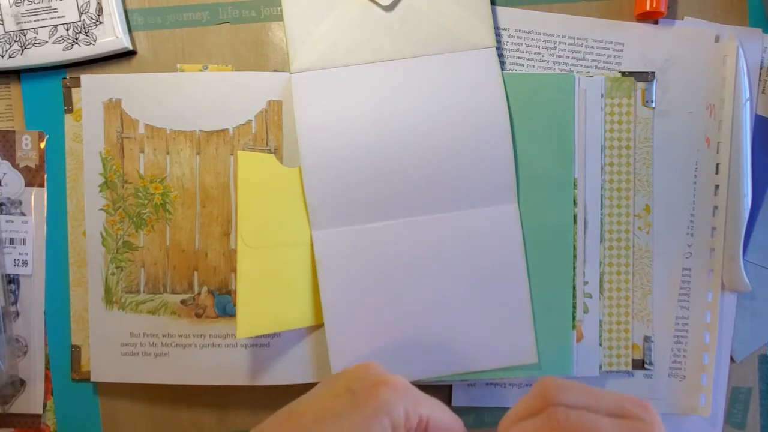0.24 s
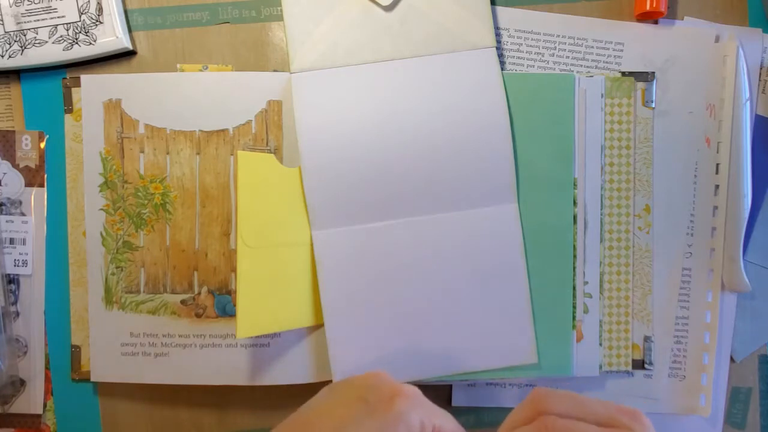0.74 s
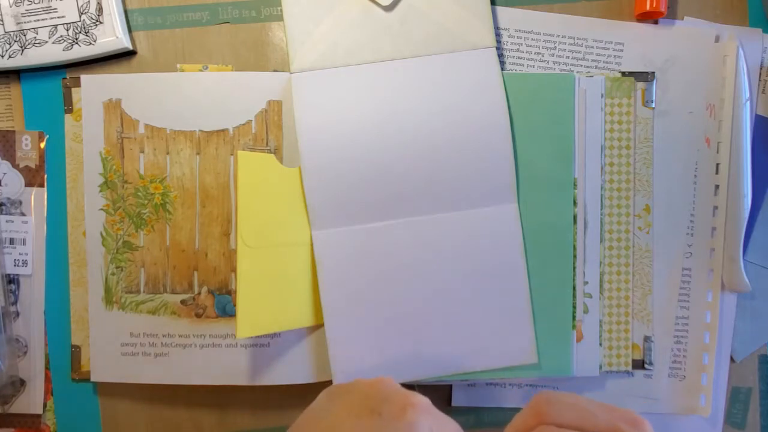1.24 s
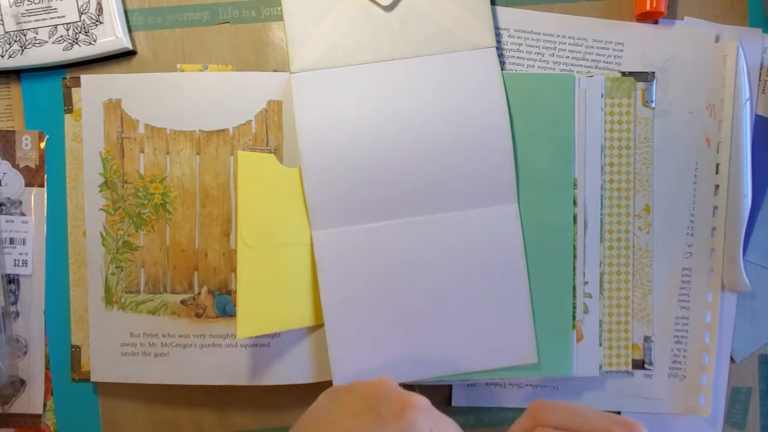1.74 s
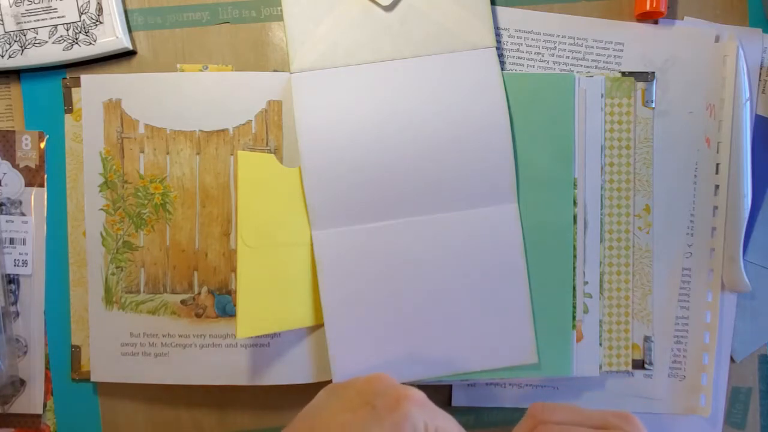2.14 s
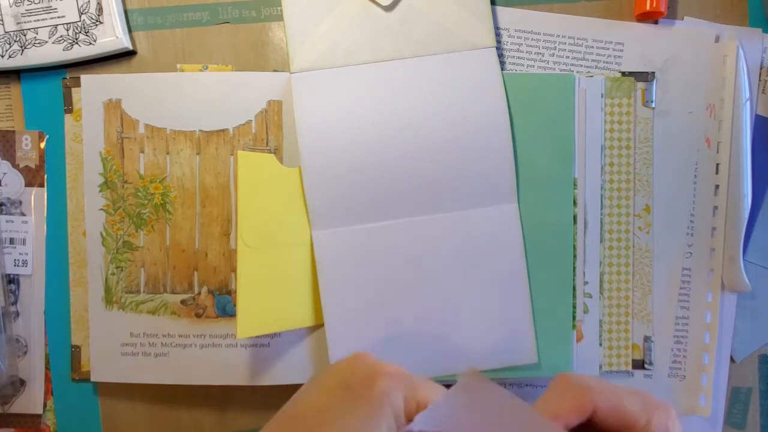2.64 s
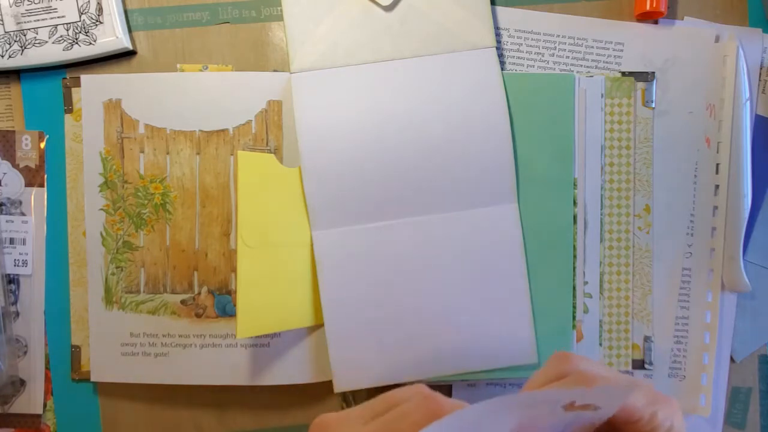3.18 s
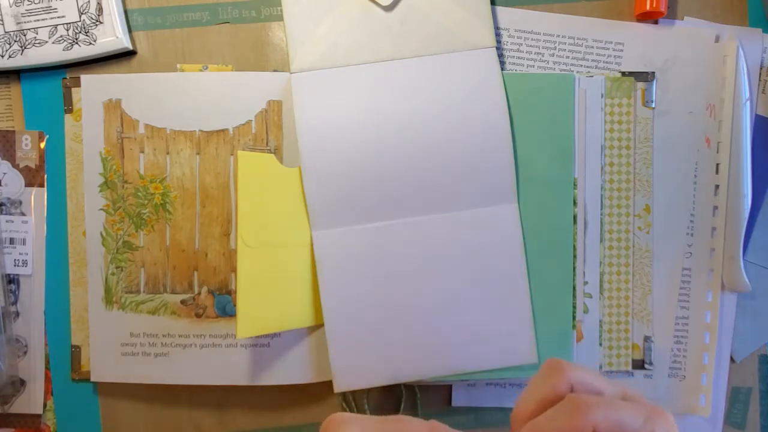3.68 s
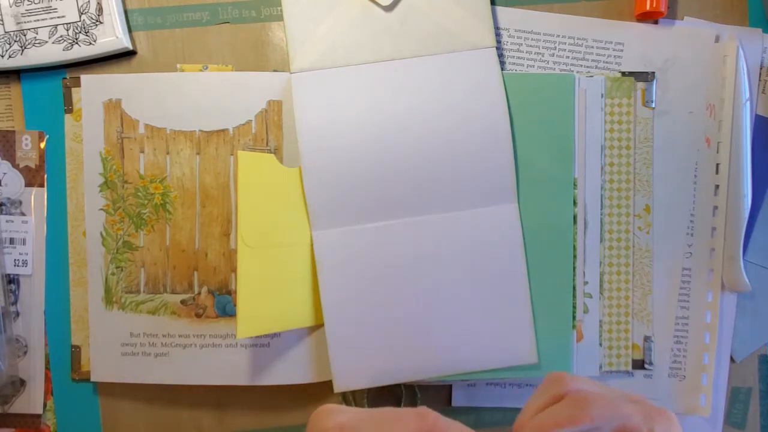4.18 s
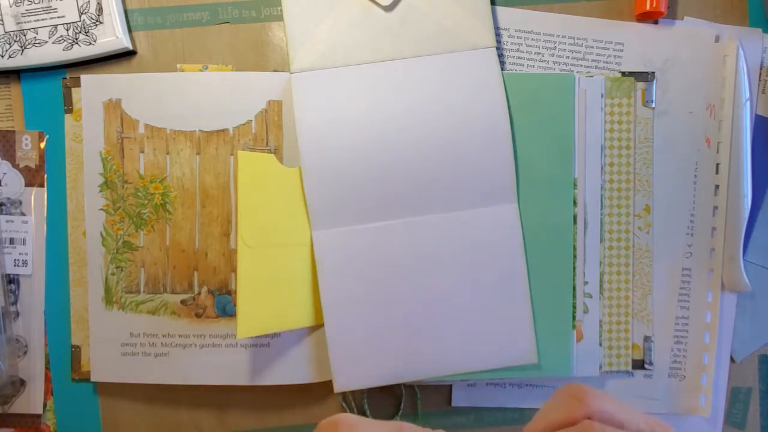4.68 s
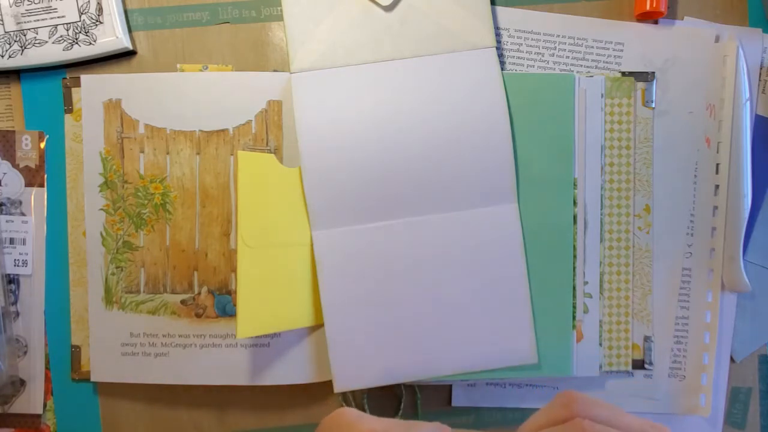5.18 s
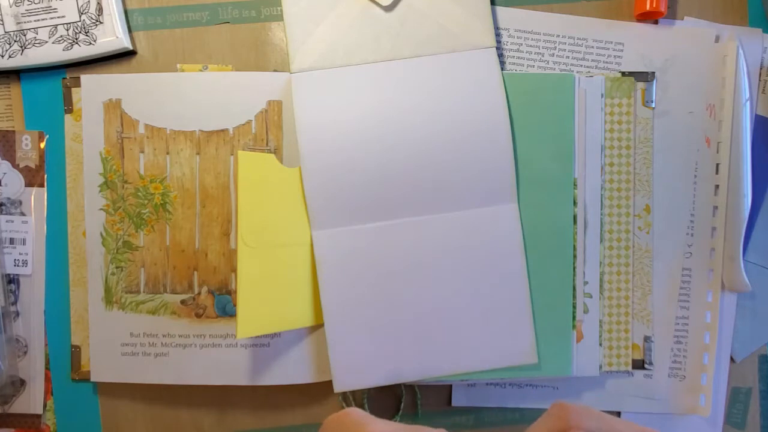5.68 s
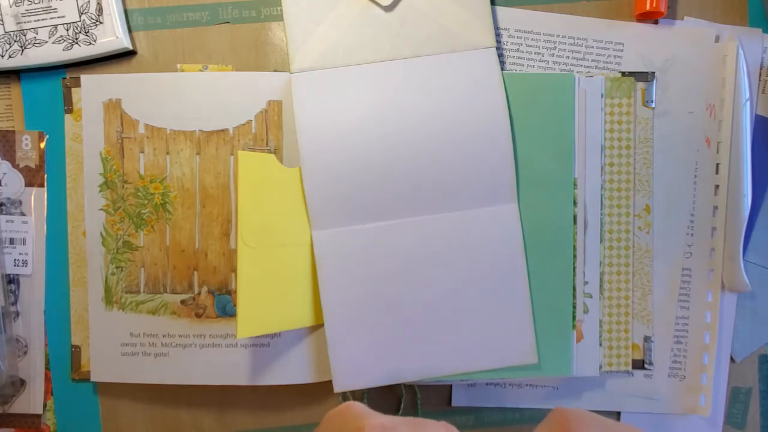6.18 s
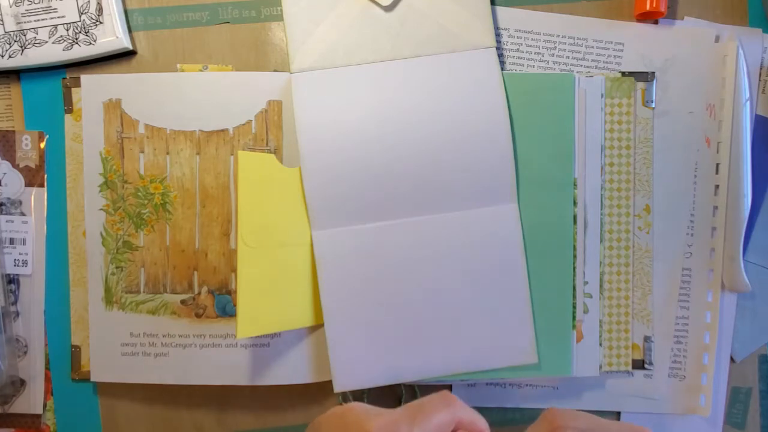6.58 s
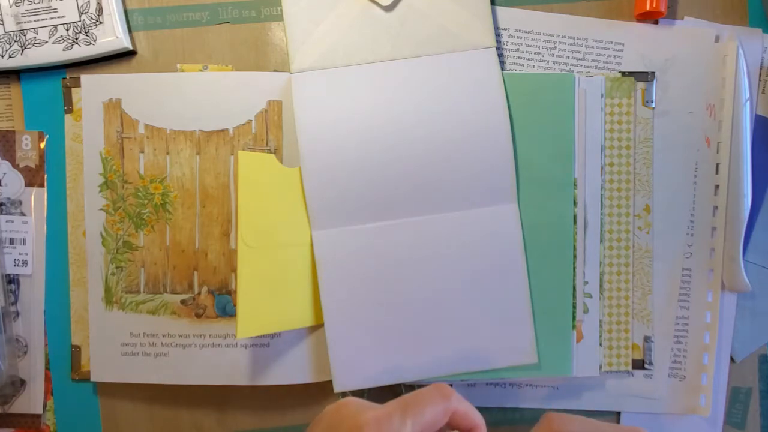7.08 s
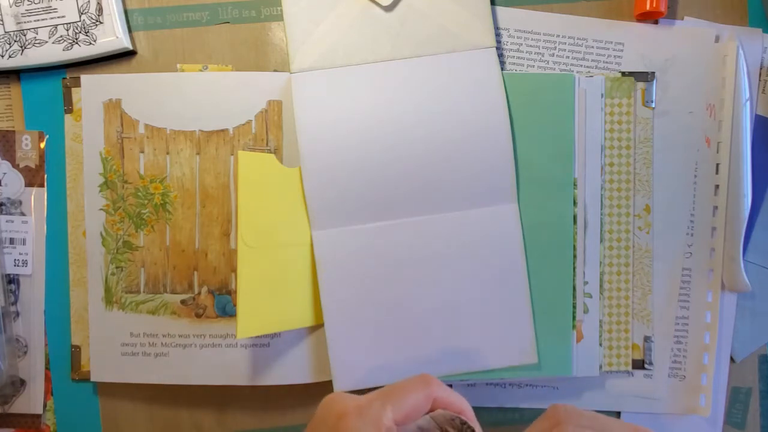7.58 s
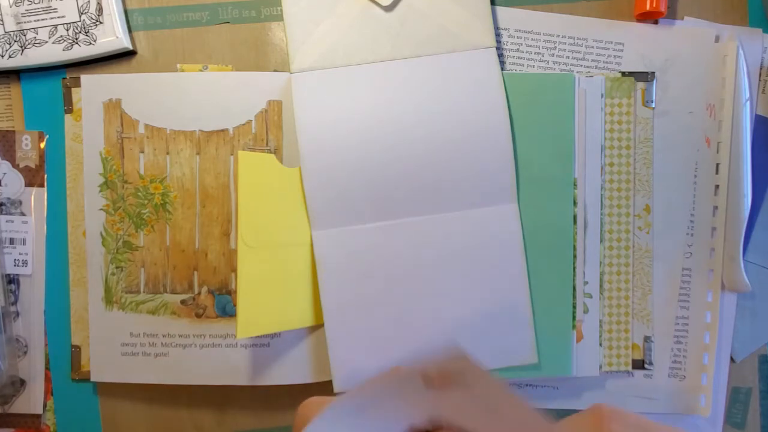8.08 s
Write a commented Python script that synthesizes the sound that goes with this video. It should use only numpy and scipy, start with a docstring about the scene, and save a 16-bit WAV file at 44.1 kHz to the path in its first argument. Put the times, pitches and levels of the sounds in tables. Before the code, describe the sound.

Short, careful rips of a thin paper page, with small snaps, sliding fingers and faint bumps on a table.

```python
"""At a table in a small room, a thin paper page is torn by hand in short rips.
Each rip is a run of breaking fibres; the held sheet radiates them and pops as it buckles.
Between rips the fingers slide to a new grip, creases snap and the hands bump the table.
A faint steady noise lies underneath."""
import sys
import numpy as np
from scipy import signal
from scipy.fft import rfft, irfft, next_fast_len
from scipy.io import wavfile
from scipy.ndimage import uniform_filter1d, map_coordinates

SR = 44100
rng = np.random.default_rng(int(sys.argv[2]) if len(sys.argv) > 2 else 0)


def waveform_to_disk(signal):
    """Save audio, clipped to [-1, 1], as 16-bit WAV at the path in sys.argv[1]."""
    frames = np.transpose(np.atleast_2d(signal))
    scaled = np.clip(frames, -1, 1) * 32767
    samples = np.round(scaled).astype(np.int16)
    wavfile.write(sys.argv[1], SR, samples)


N = 367353

# pulls of the hand: start/s, build-up/s, easing/s, fibre crackle/dB, sheet flutter/dB
RIPS = [(0.0893, 0.1, 0.035, -39, -37), (0.643, 0.0078, 0.053, -40, -42.5),
        (1.295, 0.057, 0.038, -39.5, -68), (1.894, 0.053, 0.042, -40, -43.5),
        (2.4216, 0.0078, 0.041, -40, -53), (3.901, 0.019, 0.014, -35, -39.5),
        (4.789, 0.034, .032, -38, -46), (5.286, 0.032, 0.038, -39.5, -53),
        (5.761, 0.0074, 0.05, -39.5, -44.5), (6.257, 0.034, 0.035, -34, -45.5),
        (6.804, 0.045, 0.036, -37, -36.5), (7.1882, 0.04, 0.051, -41.5, -53.5)]


def rips(breaks):
    """Fibre breaks crackle at the tear and shake the whole sheet, which answers most to a hard pull."""
    crackle_spectrum = [(300, -20), (1200, -13), (2800, -5), (4400, -2), (7000, -5), (10000, -7),
                        (15500, -8)]  # tear line: f/Hz, level/dB
    flutter_spectrum = [(100, -48), (250, -14), (390, -5), (780, -7.5), (1000, 3), (1400, 4.5),
                        (2800, -0.5), (5000, -14.5), (12000, -3)]  # shaken sheet: f/Hz, level/dB
    crackle, flutter = np.zeros((2, N))
    for start_s, build_s, ease_s, crackle_db, flutter_db in RIPS:
        force = pull(start_s, build_s, ease_s)
        crackle += amp(crackle_db) * force
        flutter += amp(flutter_db) * force ** 2.67
    tear = crackle * radiate(breaks, crackle_spectrum) + flutter * radiate(breaks, flutter_spectrum)
    return bending(tear, depth_db=2)


def pull(start_s, build_s, ease_s):
    """Gain of one pull: the tear bites at once, builds to its height, eases and stops."""
    bite_db, let_go_db, stop_s = -7.5, -8.5, 0.0044
    t = np.arange(N) / SR - start_s
    to_build = np.clip(1 - t / build_s, 0, 1)
    eased = np.clip((t - build_s) / ease_s, 0, 1)
    stop = np.exp(-np.maximum(t - build_s - ease_s, 0) / stop_s)
    return (t >= 0) * amp(bite_db * to_build ** 2.06 + let_go_db * eased ** 2.16) * stop


def glides(breaks):
    """Fibre breaks drive a free patch of the sheet; its broad resonance glides as its size changes."""
    patches = [(0.119, 0.196, 1750, 3495, -41.5), (0.371, 0.563, 1578, 3334, -64.5),
               (1.301, 1.392, 2708, 903, -46.5), (1.912, 1.97, 600, 542, -54.5),
               (2.609, 2.741, 2680, 901, -65), (5.295, 5.352, 3000, 1812, -45.5),
               (6.255, 6.316, 572, 599, -60), (6.81, 6.883, 530, 570, -51.5),
               (7.201, 7.275, 1900, 1514, -49.5)]  # resonances: start/s, end/s, from/Hz, to/Hz, level/dB
    out = np.zeros((2, N))
    for start_s, end_s, from_hz, to_hz, db in patches:
        width_hz = 0.47 * (from_hz + to_hz) / 2
        size = max(round((end_s - start_s) * SR), 256)
        phase = 2 * np.pi * np.cumsum(np.geomspace(from_hz, to_hz, size)) / SR
        kicks = rng.standard_normal((2, SR // 2)) * breaks[round(start_s * SR):][:SR // 2]
        lowpass = signal.butter(4, width_hz / 2, fs=SR, output="sos")
        drive = signal.sosfilt(lowpass, kicks)[:, :size]
        ring = unit(drive[0] * np.cos(phase) + drive[1] * np.sin(phase))
        swell = np.sin(np.linspace(0, np.pi, size))
        add(out, start_s, amp(db) * swell * ring[None])
    return out


def snaps():
    """Single bright cracks: the edge giving way at each rip, tough fibres and small creases."""
    cracks = [(0.132, -24), (0.2012, -26), (0.2162, -31), (0.568, -41.5), (0.5876, -34.5), (0.642, -26),
              (0.7555, -35.5), (0.996, -37), (1.2786, -43), (1.351, -23.5), (1.955, -22), (1.9677, -35),
              (2.452, -28.5), (2.6396, -38.5), (3.809, -30.5), (3.918, -24.5), (4.174, -39), (4.2278, -37),
              (4.4436, -33), (5.04, -37.5), (5.733, -43), (5.752, -26), (5.8956, -37), (6.22, -47),
              (6.271, -18), (6.438, -33), (6.578, -37.5), (6.7838, -32.5), (6.8467, -17.5), (6.886, -31),
              (7.168, -41), (7.245, -22), (7.258, -22.5), (7.32, -41), (7.35, -31.5), (7.468, -40.5),
              (8.08, -26.5)]  # fibres and creases: t/s, level/dB
    edges = [(start_s, -38) for start_s, *_ in RIPS]
    # f/Hz, level/dB
    spectrum = [(150, -39), (600, -5), (1100, 1.5), (2000, 2), (4000, 7), (8000, 3), (15500, -1.5)]
    out = np.zeros((2, N))
    for start_s, db in edges + cracks:
        uneven = np.add(spectrum, [0, 3] * rng.standard_normal((len(spectrum), 2)))  # 3 dB scatter
        add(out, start_s, amp(db - 6) * burst(uneven, attack_s=0.0001, decay_s=0.0038))
    return out


def pops():
    """A buckling patch sends out a bending wave: highs arrive first, then the sheet's edges return it."""
    buckles = [(0.6158, -23, 1230), (1.0592, -21.5, 1360), (1.359, -22, 1350), (1.6157, -22.5, 1520),
               (1.9323, -16, 2330), (2.903, -46, 1160), (3.332, -40, 1090), (3.398, -41.5, 850),
               (3.912, -23.5, 2600), (4.046, -35, 1160), (5.7663, -14.5, 2900), (6.005, -41.5, 1360),
               (8.17, -39, 1140)]  # buckling patches: t/s, level/dB, centre/Hz
    # multiple of the centre, level/dB
    shape = [(.08, -38), (.22, -17.5), (.45, -5.5), (.7, 1), (1.35, 1.5), (2.15, -2), (3.6, -13.5),
             (8, -36)]
    size = SR // 25
    hz, t = np.fft.rfftfreq(size, 1 / SR), np.arange(size) / SR
    wave = irfft(np.exp(-2j * np.pi * np.sqrt(hz) * 0.05586), size)  # travel time ~ 1 / sqrt(f)
    out = np.zeros((2, N))
    for start_s, db, centre_hz in buckles:
        returns = pair(size) * (1 - np.exp(-t / 0.0042)) * np.exp(-t / 0.0018)
        spectrum = [(multiple * centre_hz, level_db) for multiple, level_db in shape]
        ring = coloured(unit(wave) + unit(returns), lambda hz: along(spectrum, hz))
        add(out, start_s, amp(db - 23) * unit(ring))
    return out


def grips():
    """Fingers slide on the paper with a fine, soft grain; each rub swells and fades."""
    rubs = [(0, 0.077, -56.5, -65), (0.27, .08, -56, -61), (0.51, 0.25, -60.5, -71.5),
            (0.626, 0.023, -46, -51), (0.797, 0.11, -57.5, -69.5), (0.997, 0.079, -60.5, -63.5),
            (1.502, 0.07, -59.5, -76), (1.678, 0.094, -70, -72.5), (1.869, 0.027, -53, -96),
            (2.099, .09, -60, -75.5), (2.416, 0.033, -56.5, -80), (2.55, 0.24, -62.5, -74.5),
            (2.72, .07, -56, -59.5), (2.953, 0.3, -57, -70.5), (3.165, 0.078, -53.5, -70),
            (3.362, 0.075, -59.5, -71.5), (3.514, 0.056, -51, -62.5), (3.63, .09, -68.5, -72.5),
            (3.881, 0.081, -49, -55), (3.971, 0.035, -43.5, -54), (4.047, 0.033, -48.5, -54.5),
            (4.115, 0.028, -56, -64.5), (4.215, 0.049, -67.5, -67), (4.369, 0.12, -56.5, -73),
            (4.47, 0.018, -56, -63.5), (4.602, 0.05, -61, -81), (4.969, 0.051, -54.5, -70),
            (5.091, 0.094, -57, -70), (5.477, 0.072, -58, -79), (5.613, 0.056, -58, -64),
            (5.942, 0.14, -61.5, -69.5), (6.105, 0.014, -61.5, -76), (6.261, 0.051, -53, -90),
            (6.484, 0.043, -50.5, -58.5), (6.595, 0.082, -58, -67.5), (6.922, 0.15, -58.5, -61),
            (7.006, 0.034, -45, -71), (7.12, 0.057, -75, -73), (7.363, 0.04, -56, -64.5),
            (7.748, 0.04, -64.5, -71.5), (7.853, 0.028, -51, -64), (7.924, 0.029, -49.5, -61),
            (8.086, 0.061, -52.5, -60.5), (8.17, 0.02, -56, -53.5), (8.3, 0.16, -61, -71.5)]  # grip changes: middle/s, half length/s, hiss/dB, rustle/dB
    hiss_spectrum = [(300, -62), (1500, -11.5), (3300, -3.5), (5000, -4), (6800, -2), (8500, -7),
                     (15500, -6.5)]  # sliding fingers: f/Hz, level/dB
    rustle_spectrum = [(100, -13.5), (250, -14.5), (430, -5.5), (800, -9.5), (1030, -1.5), (1800, -0.5),
                       (3000, -4), (8000, -18)]  # rubbed sheet: f/Hz, level/dB
    t, power = np.arange(N) / SR, np.zeros((2, N))
    for middle_s, half_s, hiss_db, rustle_db in rubs:
        near = np.abs(t - middle_s) < 3 * half_s
        swell = np.exp(-((t[near] - middle_s) / half_s) ** 2)
        power[:, near] += (amp([[hiss_db], [rustle_db]]) * swell) ** 2
    hiss, rustle = np.sqrt(power)
    slips = grains(per_s=600, spread_db=9, decay_s=0.00075, bed=1.6)
    rubbing = hiss * radiate(slips, hiss_spectrum) + rustle * radiate(slips, rustle_spectrum)
    return bending(rubbing, depth_db=2)


def knocks():
    """Soft flesh on a table padded with paper: a short dull thud."""
    bumps = [(1.94, -47.5), (2.906, -51), (3.332, -50), (3.398, -55), (4.46, -48.5), (5.13, -52),
             (5.772, -50.5)]  # hand on table: t/s, level/dB
    thud_spectrum = [(40, -28), (100, -6), (170, -9), (260, -7), (380, 2.5), (600, -12.5), (1500, -10),
                     (5000, -47.5)]  # padded table: f/Hz, level/dB
    out = np.zeros((2, N))
    for start_s, db in bumps:
        add(out, start_s, amp(db) * burst(thud_spectrum, attack_s=0.0011, decay_s=0.013))
    return out


def bending(x, depth_db):
    """The sheet's many resonances shift as it bends: patches of gain over frequency and time."""
    spectra = signal.stft(x, nperseg=1024)[2]
    row, col = np.indices(spectra.shape[1:])
    field = map_coordinates(rng.standard_normal(row.shape), [np.sqrt(row) * 3, col / 5], order=1)
    bent = signal.istft(spectra * amp(depth_db * unit(field)), nperseg=1024)[1][:, :N]
    return bent / amp(depth_db ** 2 * np.log(10) / 20)  # keeps the mean power


def workplace(x):
    """The table and its surroundings colour the sound with resonances and one dip."""
    bands = [(545.8, 36, 6.5), (660, 32, 8.5), (806, 61, -0.5), (1100, 260, 7), (2036, 123, 2),
             (3055, 570, 2.5), (4310, 440, 0.5)]  # resonances and dip: f/Hz, width/Hz, gain/dB
    return coloured(x, lambda hz: sum(db / (1 + (2 * (hz - f) / width) ** 2) for f, width, db in bands))


def room(x):
    """A short diffuse tail, different at each ear, whose treble dies first."""
    t60_s = [(200, 0.23), (1000, 0.18), (4000, 0.19), (15000, 0.12)]  # reverberation: f/Hz, T60/s
    hz, t, spectra = signal.stft(pair(SR // 3), SR, nperseg=256)
    decay = amp(-60 * t / along(t60_s, hz)[:, None])
    tail = signal.istft(spectra * decay, SR, nperseg=256)[1]
    tail *= 1 - np.exp(-np.arange(tail.shape[1]) / SR / 0.00033)
    return signal.fftconvolve(x, tail / np.linalg.norm(tail[0]), axes=1)[:, :N]


def background():
    """Faint steady rumble and hiss."""
    spectrum = [(20, -15.5), (50, 3), (120, -5), (250, -10.5), (700, -21), (1100, -17.5), (2200, -15.5),
                (3300, -6.5), (4800, -12), (6800, -6), (8500, -16), (16000, -22)]  # noise floor: f/Hz, level/dB
    return amp(-69.5) * radiate(1, spectrum)


def grains(per_s, spread_db, decay_s, bed):
    """Envelope of tiny bursts of random time and size over a steady bed of relative power."""
    hits = rng.random(N) < per_s / SR
    energy = amp(spread_db * np.minimum(rng.standard_normal(N), 1.2)) ** 2
    power = signal.lfilter([1], [1, -np.exp(-2 / (decay_s * SR))], hits * energy)
    power /= np.abs(uniform_filter1d(power, size=1300)) + 1e-9  # local mean near 1
    return np.sqrt((power + bed) / (1 + bed))


def radiate(envelope, spectrum):
    """Noise under an envelope, sounding through a body with this spectrum, at rms 1."""
    return unit(coloured(envelope * pair(N), lambda hz: along(spectrum, hz)))


def burst(spectrum, attack_s, decay_s):
    """A 40 ms noise burst with the energy of 1 ms at rms 1."""
    t = np.arange(SR // 25) / SR
    noise = pair(len(t)) * (1 - np.exp(-t / attack_s)) * np.exp(-t / decay_s)
    return unit(coloured(noise, lambda hz: along(spectrum, hz))) / np.sqrt(40)


def pair(size):
    """White stereo noise, partly alike in the bass and mids, unrelated in the treble."""
    likeness = [(60, 0.36), (250, 0.45), (600, 0.65), (1100, 0.76), (2000, 0.3), (4000, 0.21), (8000, 0)]  # left-right likeness: f/Hz, correlation
    n_fft = 2 * next_fast_len(size // 2 + 1)
    angle = np.arccos(along(likeness, np.fft.rfftfreq(n_fft, 1 / SR))) / 2
    white = rfft(rng.standard_normal((2, n_fft)))
    mid, side = irfft(white * [np.cos(angle), np.sin(angle)])[:, :size]
    return np.array([mid + side, mid - side])


def coloured(x, gain_db):
    """Minimum-phase filter with the response gain_db(hz)."""
    size = x.shape[-1]
    n_fft = 2 * next_fast_len(size // 2 + 2048)
    gain = amp(gain_db(np.fft.rfftfreq(n_fft, 1 / SR)))
    cepstrum = irfft(np.log(gain + 1e-6))
    cepstrum[1:n_fft // 2] *= 2
    cepstrum[n_fft // 2 + 1:] = 0
    return irfft(rfft(x, n_fft) * np.exp(rfft(cepstrum)), n_fft)[..., :size]


def along(points, hz):
    """Interpolate (f/Hz, value) points on a log axis."""
    f, values = np.transpose(points)
    return np.interp(np.log(hz + 1), np.log(f), values)


def add(track, start_s, sound):
    """Mix a sound into the track."""
    part = track[:, round(start_s * SR):][:, :sound.shape[1]]
    part += sound[:, :part.shape[1]]


def amp(db):
    """Decibels to gain."""
    return 10 ** (np.asarray(db) / 20)


def unit(x):
    """Scale to rms 1."""
    return x / np.sqrt(np.mean(x ** 2) + 1e-20)


def scene():
    """Paper over the table, the room's answer and the quiet background."""
    breaks = grains(per_s=1200, spread_db=5.2, decay_s=0.0007, bed=0.27)
    highpass = signal.butter(4, 270, "high", fs=SR, output="sos")  # the tearing carries little bass
    tearing = signal.sosfilt(highpass, rips(breaks) + glides(breaks))
    handling = grips() + snaps() + knocks()
    buckling = pops()
    reverb = room(amp(-7.5) * tearing + amp(-6) * handling + amp(-5.5) * buckling)
    return workplace(tearing + handling + buckling + reverb) + background()


def record(dry):
    """Two slightly unlike, band-limited microphones, the right a little nearer."""
    balance_db = [(100, -1), (300, 0), (1100, 1.3), (2200, 3.9), (4200, 1), (8000, -2.5), (13000, -1.5)]  # microphone mismatch: f/Hz, left minus right/dB
    lag_s, top_hz = 2.5e-5, 15900
    n_fft = next_fast_len(N + SR // 4)
    hz = np.fft.rfftfreq(n_fft, 1 / SR)
    side = np.array([[.5], [-.5]])
    response = amp(side * along(balance_db, hz)) * np.exp(-2j * np.pi * hz * side * lag_s)
    return irfft(rfft(dry, n_fft) * response * (hz < top_hz), n_fft)[:, :N]


dry = scene()
out = record(dry)
waveform_to_disk(out)
```